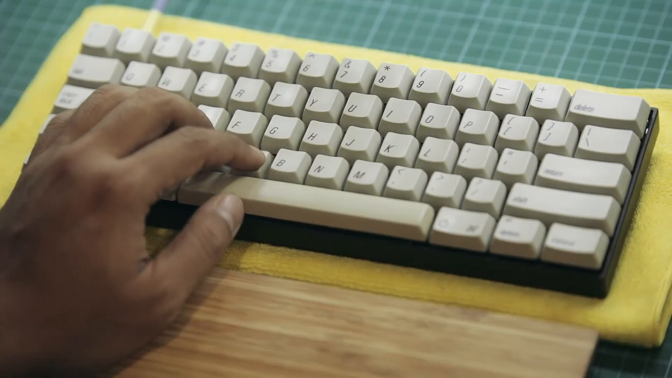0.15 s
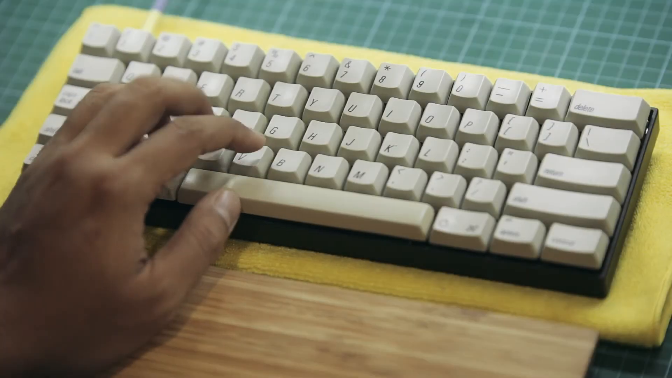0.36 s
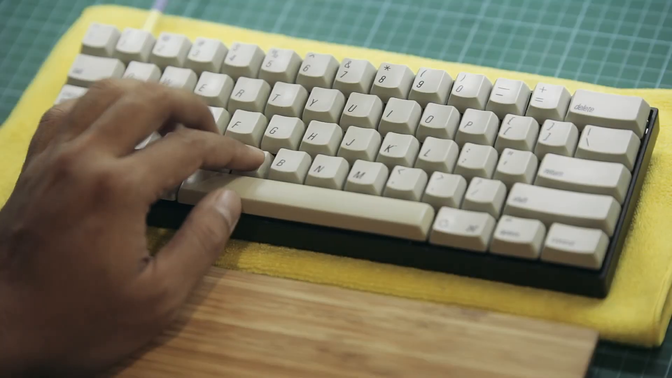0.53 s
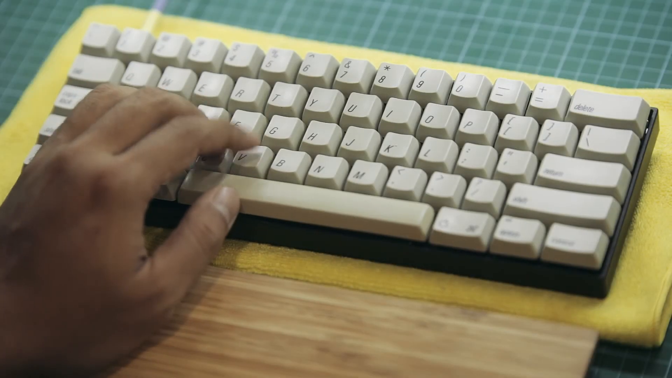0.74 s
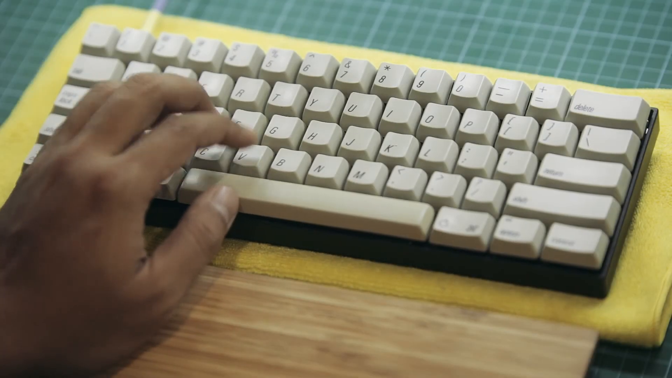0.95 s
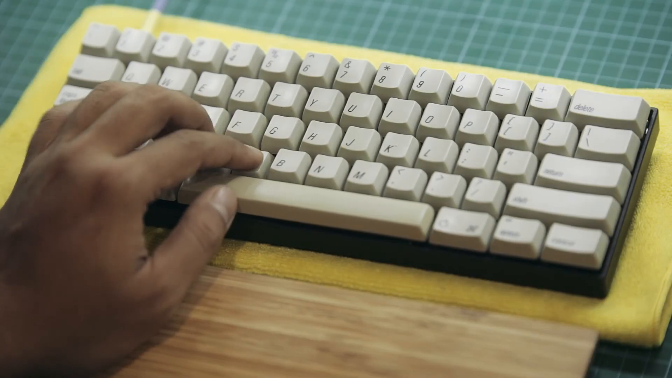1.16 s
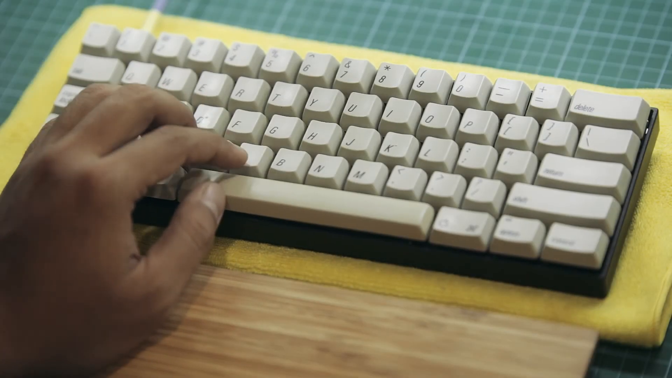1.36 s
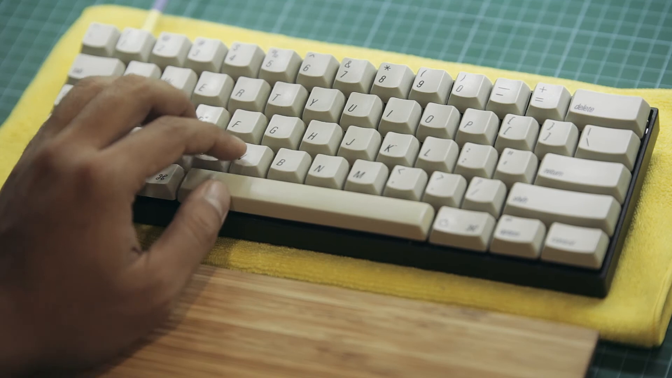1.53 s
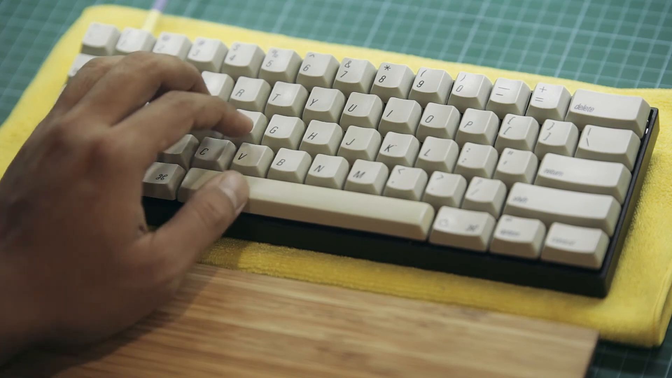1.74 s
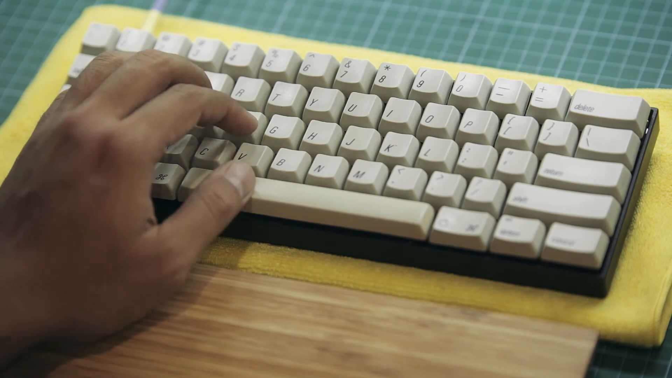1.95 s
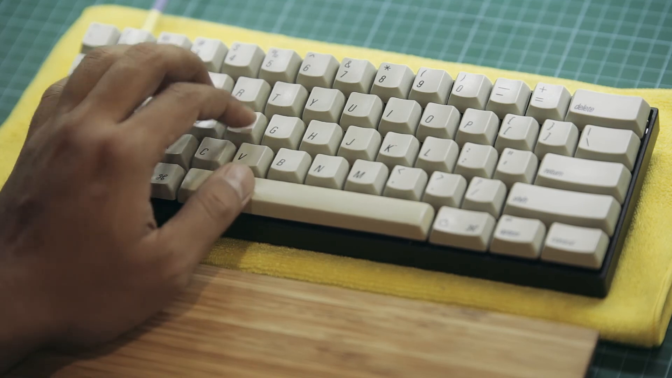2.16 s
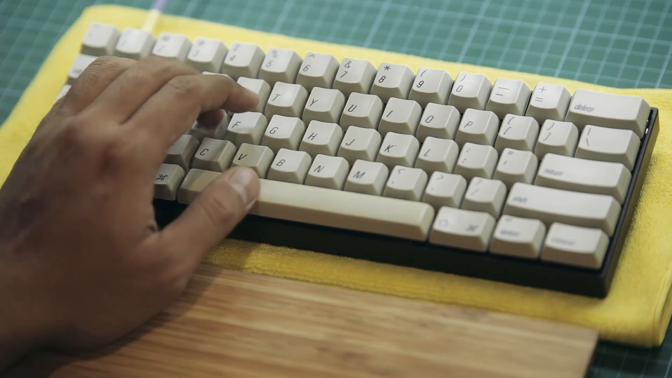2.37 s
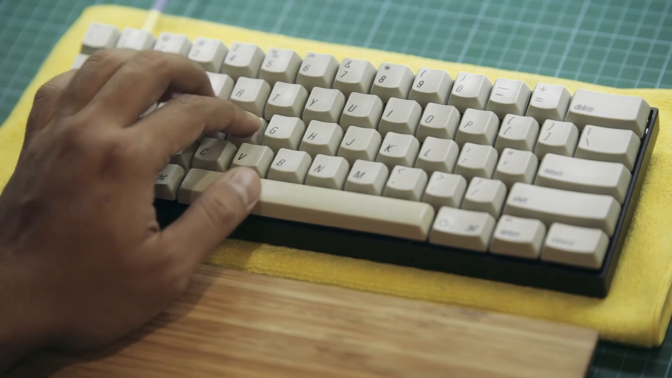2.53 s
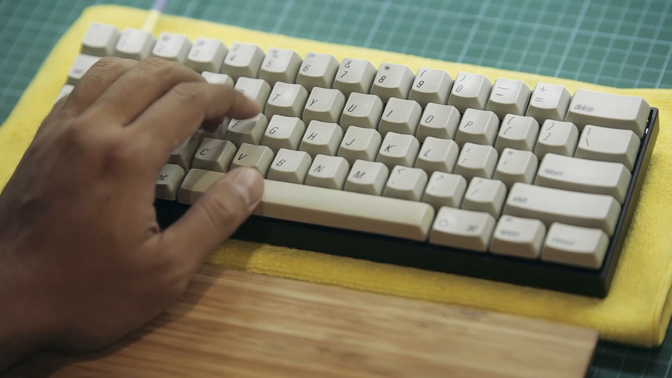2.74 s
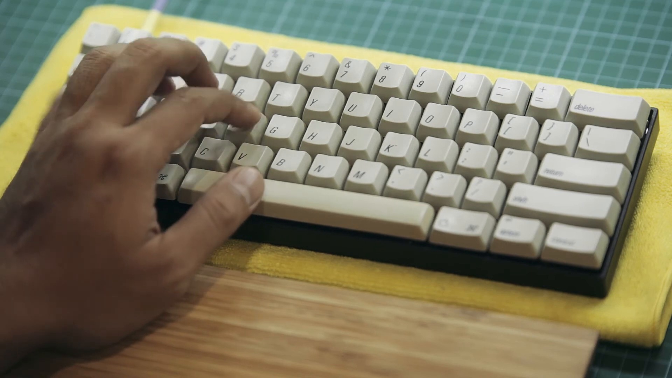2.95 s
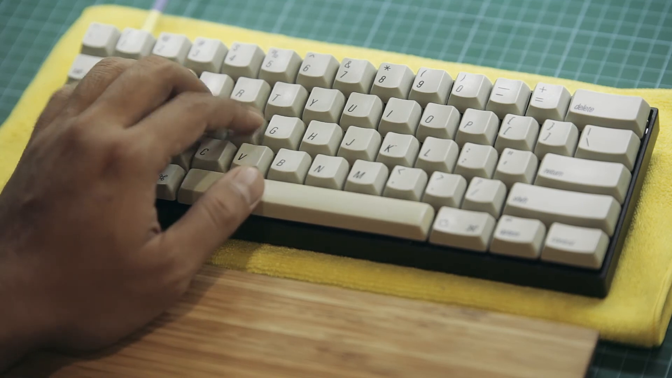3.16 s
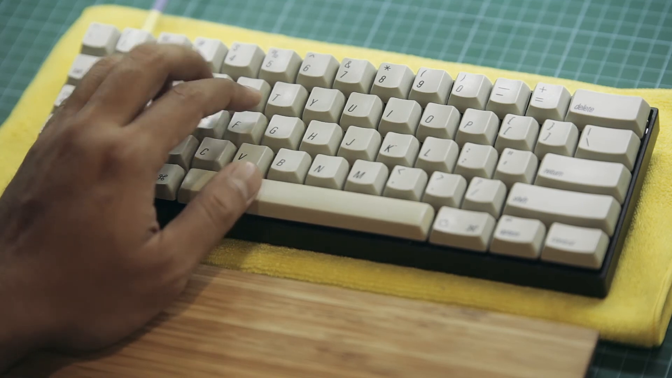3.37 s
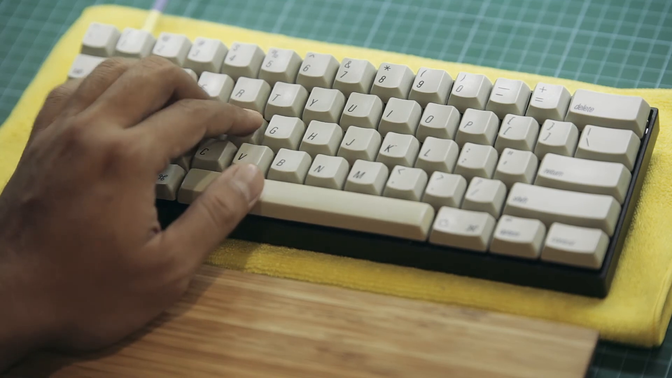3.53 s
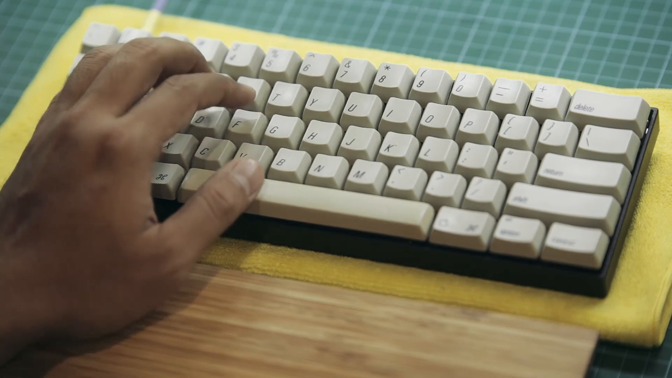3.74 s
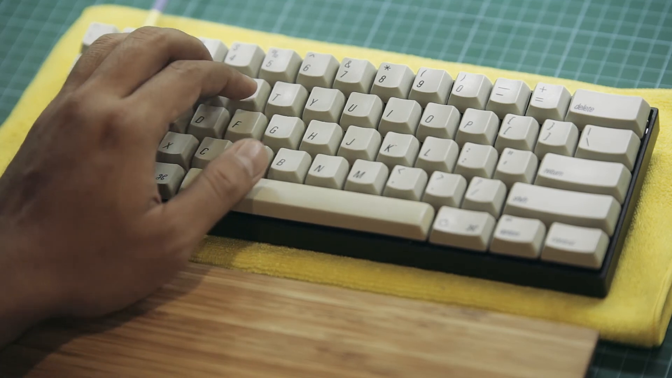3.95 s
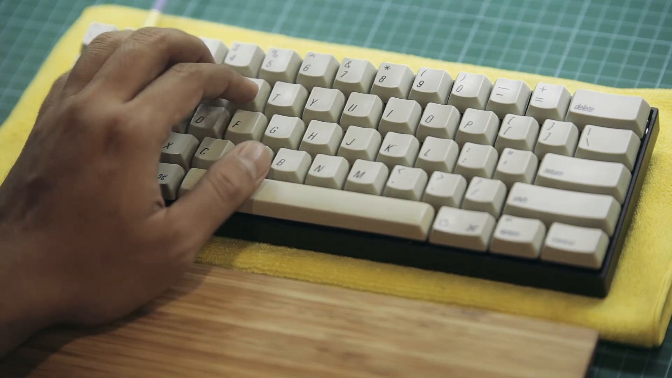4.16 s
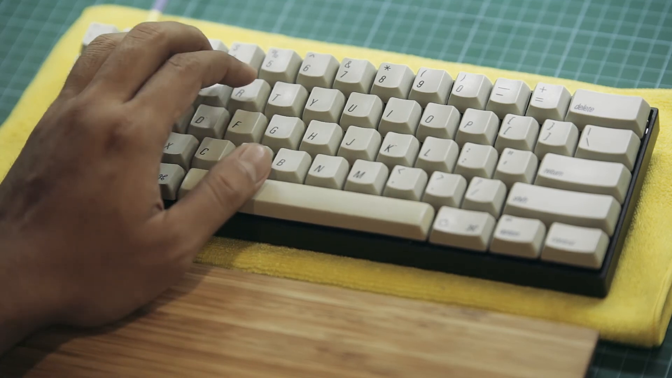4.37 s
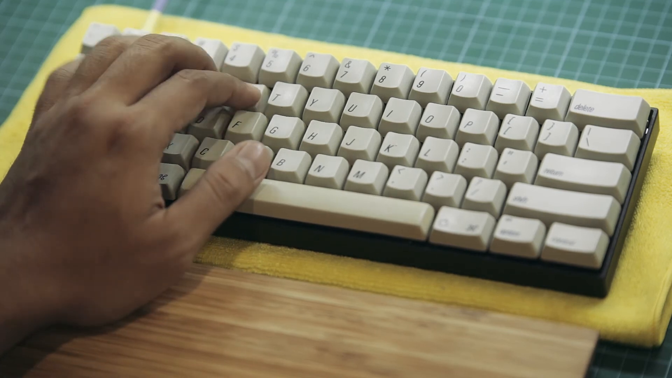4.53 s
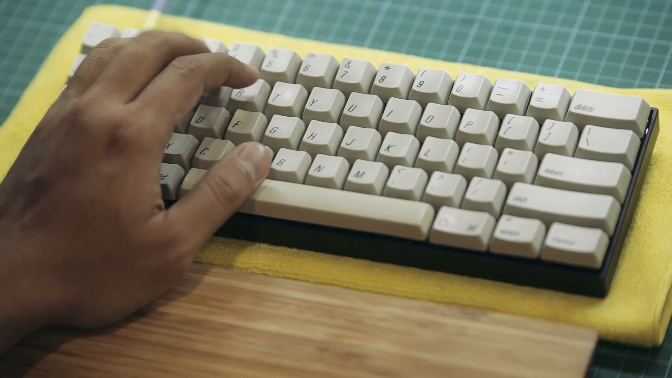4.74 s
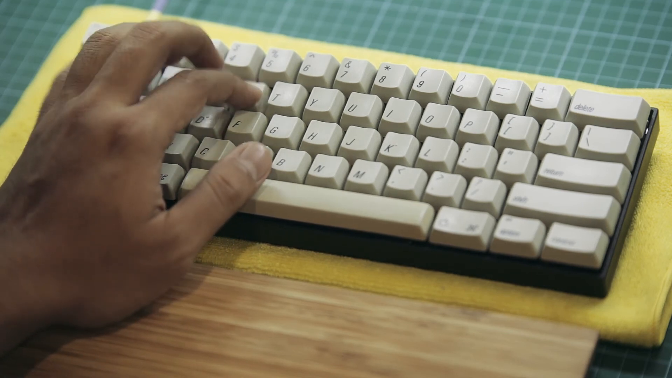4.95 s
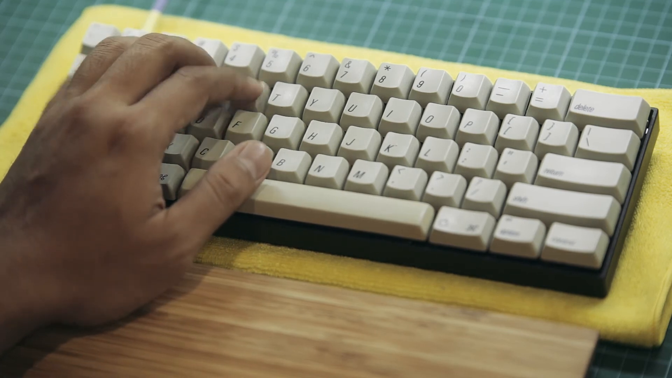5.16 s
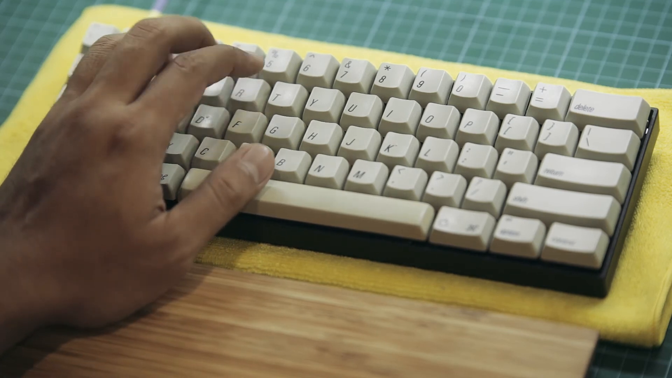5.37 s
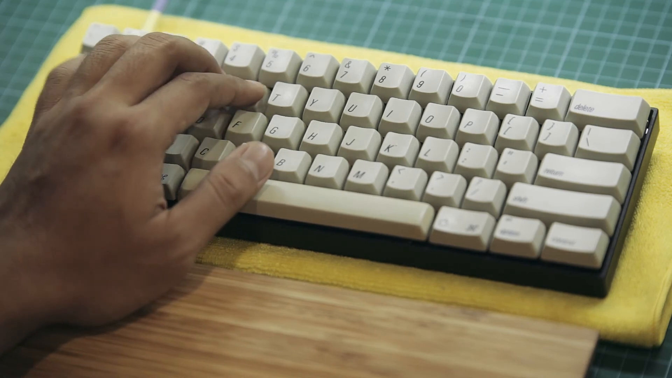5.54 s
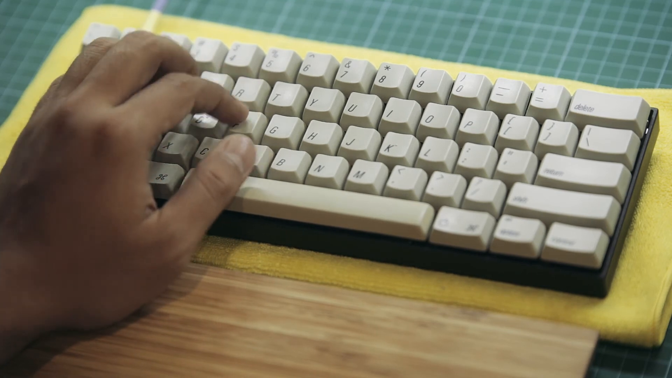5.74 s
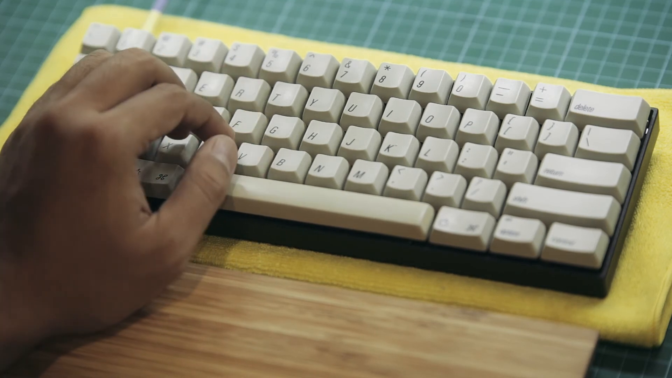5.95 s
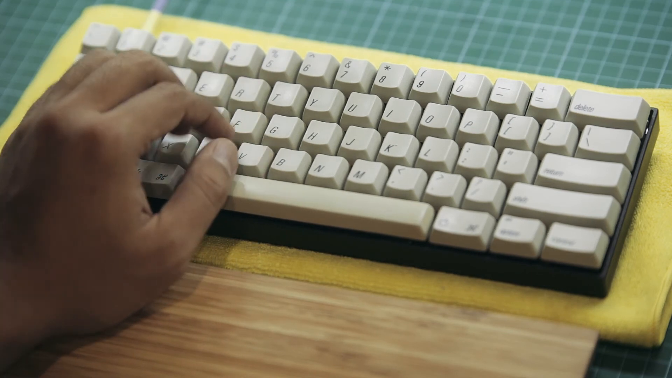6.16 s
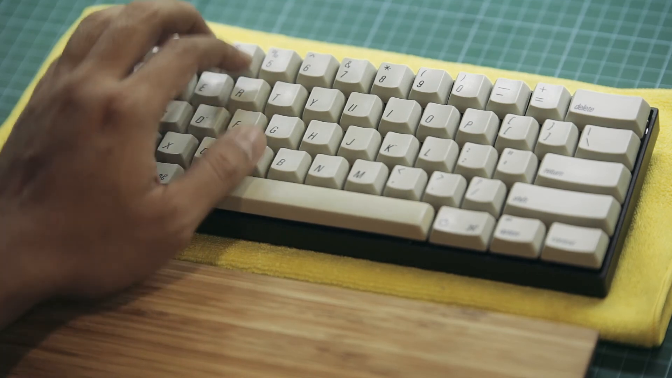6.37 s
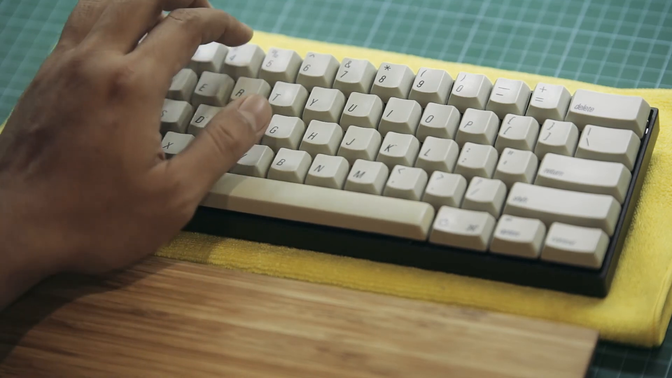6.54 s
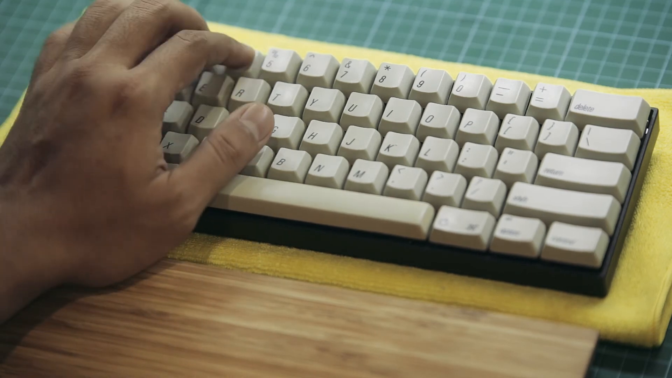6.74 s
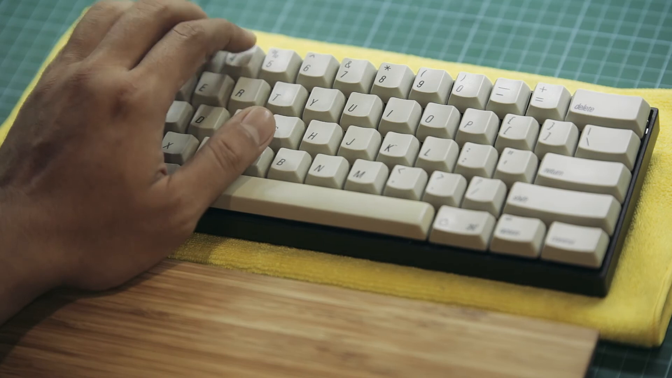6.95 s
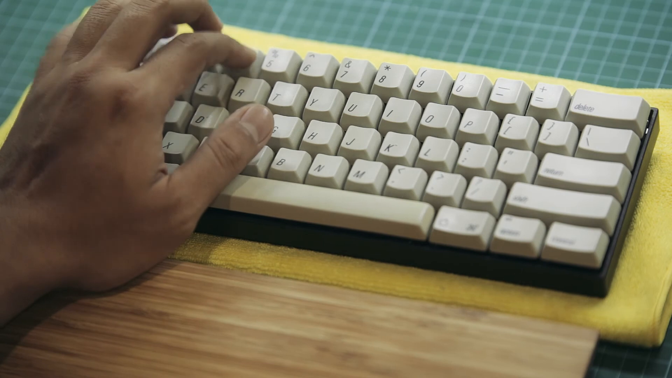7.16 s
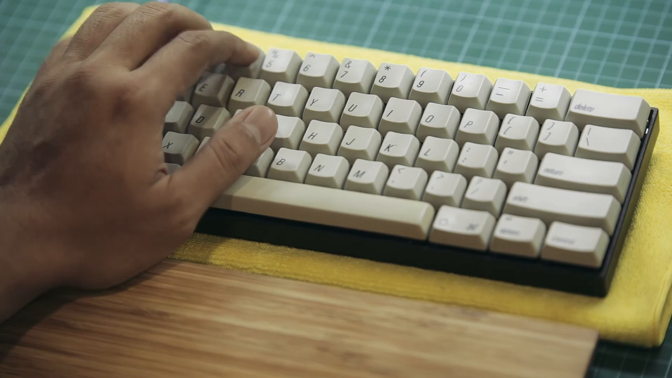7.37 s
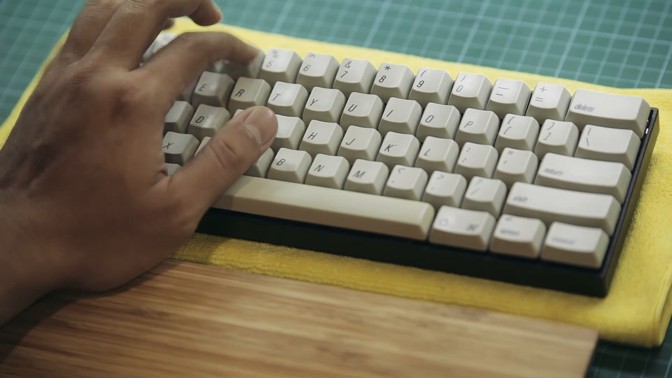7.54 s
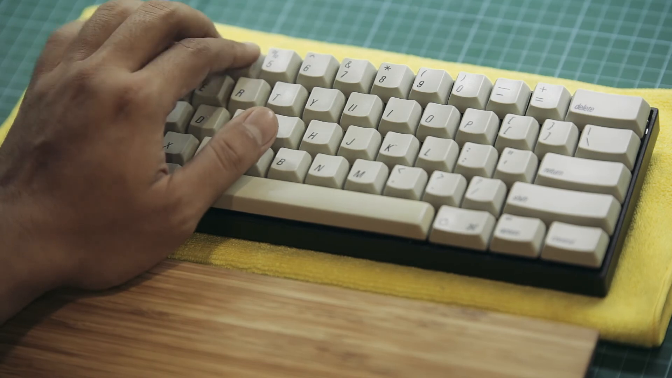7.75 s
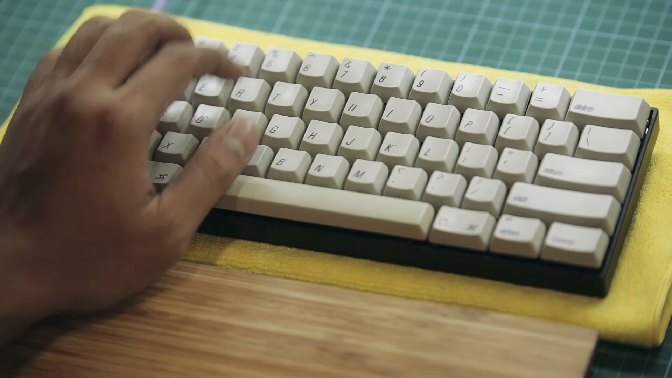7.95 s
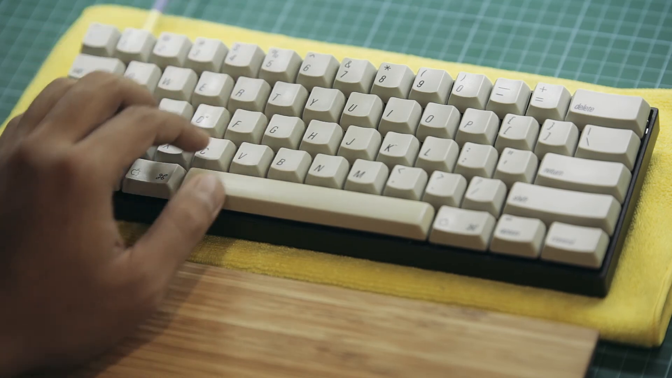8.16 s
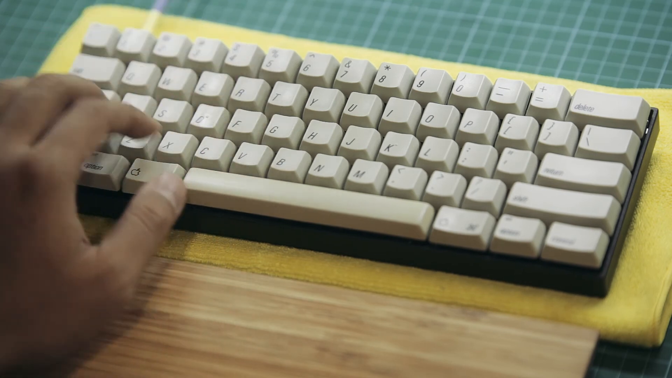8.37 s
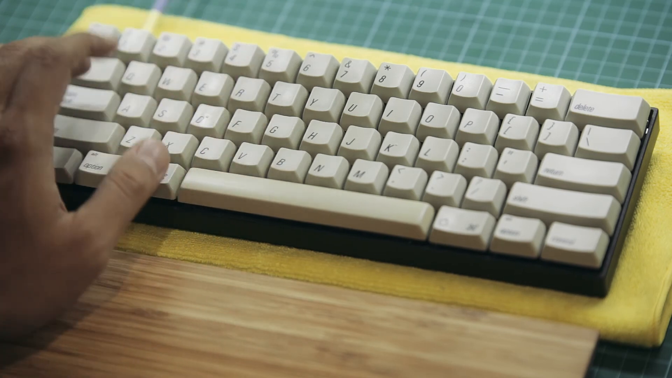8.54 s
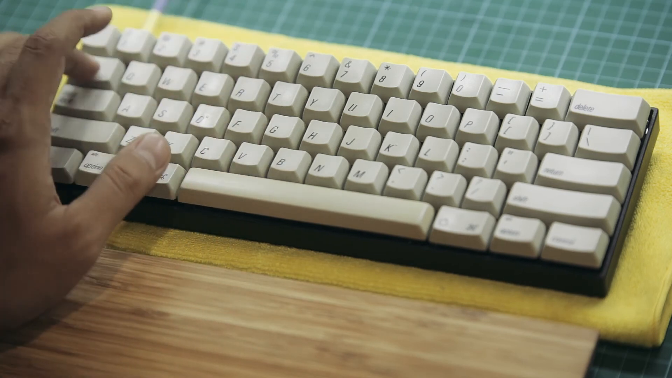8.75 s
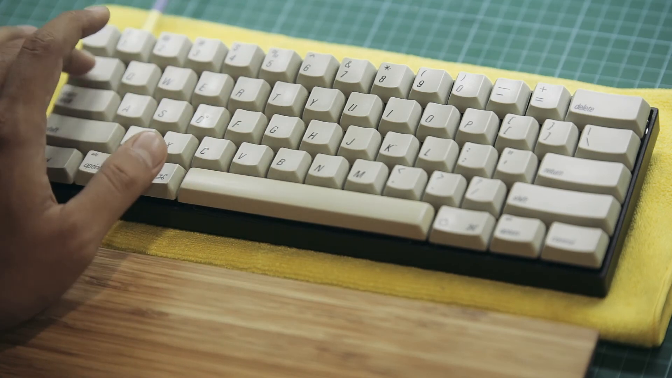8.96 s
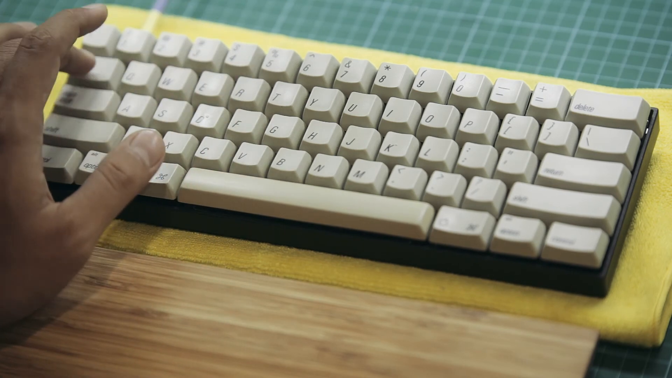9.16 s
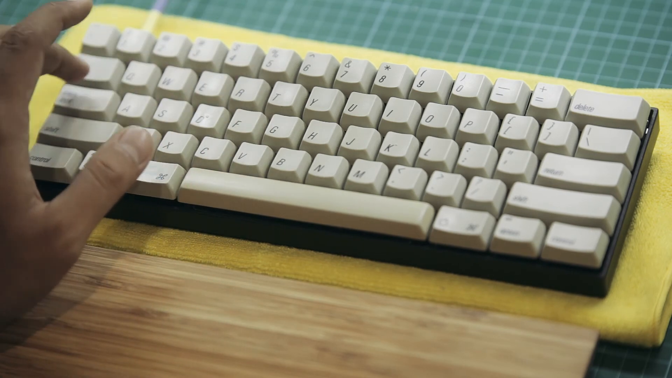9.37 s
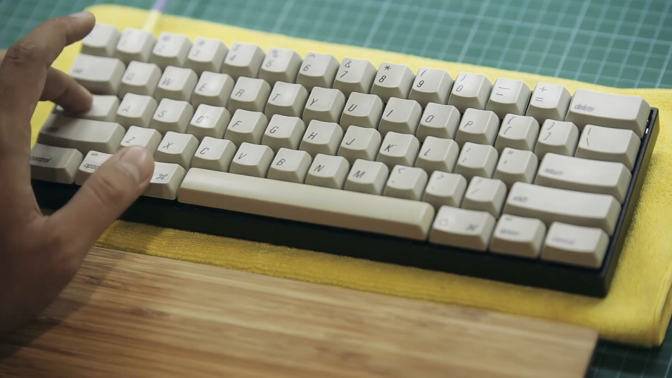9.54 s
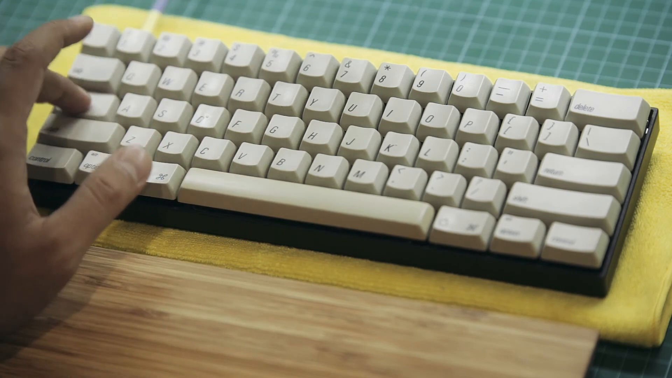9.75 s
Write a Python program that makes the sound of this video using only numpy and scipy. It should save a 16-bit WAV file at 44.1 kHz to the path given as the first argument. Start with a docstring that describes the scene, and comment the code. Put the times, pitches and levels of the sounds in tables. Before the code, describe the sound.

Close stereo pickup of a small clicky mechanical keyboard on a cloth-covered wooden desk in a small room. Dense, crisp typing comes at once, pauses, then returns in three more bursts with almost silent gaps. After a soft hiss of skin across cloth, six slower, evenly spaced presses follow, each with a click down and a lighter return. Low mains hum and faint air noise run underneath.

```python
"""A small clicky keyboard on a cloth on a wooden desk, in a small room, heard by a pair of microphones.
One hand types four fast bursts, touching keycaps between them; a fingertip makes two faint ticks before the
fourth, then the hand hisses over the cloth and one finger presses side keys slowly, six times in all.
Struck modes make keycap, case, switch and leaf; a steel plate sings on as decaying tones, the desk thuds and
noise tails are the room. Mains hum, air noise and a faint whine lie underneath throughout."""
import sys
import numpy as np
from scipy import signal
from scipy.fft import rfft, irfft, next_fast_len
from scipy.io import wavfile
from scipy.ndimage import uniform_filter1d, map_coordinates

SR = 44100
rng = np.random.default_rng(int(sys.argv[2]) if len(sys.argv) > 2 else 0)


def int16_out(signal):
    """Quantize to a 16-bit WAV file."""
    q = np.round(np.clip(np.atleast_2d(signal).T, -1, 1) * 32767)
    wavfile.write(sys.argv[1], SR, q.astype(np.int16))


N = 432621

# Bright ticks, mostly the switch leaf snapping over. Each row: time in seconds, switch level in dB.
LEAF_SNAPS = [(0.0884, -30), (0.1594, -32), (0.188, -26), (0.249, -26.5), (0.4491, -30.5), (0.492, -28.5),
              (0.5177, -29.5), (0.5826, -24), (0.7465, -28.5), (0.7911, -30), (0.8625, -40.5),
              (1.0577, -28), (1.0971, -31), (1.1548, -26.5), (2.378, -38.5), (2.436, -40), (2.53, -28.5),
              (2.755, -35), (2.81, -33), (2.868, -43.5), (2.892, -29.5), (3.114, -35), (3.157, -38),
              (3.178, -30.5), (3.4013, -43), (3.592, -31.5), (4.424, -34), (4.4977, -34.5), (4.543, -31),
              (4.7333, -31.5), (4.7774, -33), (4.829, -37), (4.881, -30.5), (5.0687, -29), (5.117, -33.5),
              (5.1517, -36), (5.181, -36), (5.2068, -29), (5.3956, -25), (5.4493, -36), (5.484, -39),
              (5.5163, -30.5), (5.525, -31), (5.584, -25.5), (5.7292, -35), (6.6798, -33.5),
              (6.7483, -32.5), (6.8074, -24), (7.036, -39), (7.1286, -27), (7.331, -37), (7.355, -37.5),
              (7.412, -35), (7.49, -24.5), (7.6831, -36), (7.7072, -42), (7.7371, -40), (7.7999, -29.5)]
# Keys hitting bottom or top in the fast bursts, and one faint knock among the slow presses.
# Each row: time in seconds, keycap energy in dB, hardness (switch over keycap) in dB.
KEY_TAPS = [(0.0982, -27.5, -9.5), (0.171, -27, -13.5), (.196, -22, -12), (0.2334, -20.5, -35),
            (0.245, -34, 5), (0.261, -33, -17), (0.2853, -21.5, -14.5), (0.3159, -23.5, -4.5),
            (0.3979, -22.5, -9), (.4147, -38.5, -4.5), (0.4563, -24, -10.5), (.501, -26, -11),
            (0.5297, -26, -5.5), (0.5711, -22, -17.5), (.59, -25, -18.5), (.611, -19.5, -10),
            (0.63, -22.5, -3.5), (0.7126, -22.5, -17.5), (0.7247, -41.5, 4.5), (0.751, -20, -19),
            (0.7816, -42, -1), (0.8114, -27, -8), (0.817, -24.5, -5), (0.8867, -22.5, -7),
            (.896, -27.5, -15.5), (0.9055, -21, -9.5), (0.9456, -24, -5), (1.0199, -19.5, -8.5),
            (1.065, -23.5, -19), (1.1055, -30, 0.5), (1.118, -24.5, -10.5), (1.173, -30.5, -17.5),
            (1.205, -22, -16.5), (1.231, -25, -11), (1.279, -29, -8), (1.3225, -25, -8.5),
            (2.385, -20, -15.5), (2.448, -25.5, -12), (2.4621, -38.5, 5.5), (2.4724, -27, -10),
            (2.5075, -20.5, -19.5), (2.5246, -40.5, 9.5), (2.543, -31, -7), (2.5818, -22.5, -9.5),
            (2.6116, -29, -3), (2.6878, -24, -8), (2.7616, -23, -13.5), (2.803, -34, -2.5),
            (2.8162, -24.5, -16), (2.8253, -29.5, -4), (2.8746, -23.5, -15.5), (2.901, -24, -7),
            (2.934, -24, -9), (2.967, -25.5, -2.5), (3.042, -25, -8), (3.0657, -39.5, -10.5),
            (3.1187, -20.5, -13), (3.1687, -25.5, -6.5), (3.1883, -28.5, -13.5), (3.2332, -35.5, -1.5),
            (3.2435, -23, -14.5), (3.261, -35, 9.5), (3.268, -25.5, -10.5), (3.3037, -24, -8.5),
            (3.3315, -26, -6), (3.4075, -22, -9), (3.497, -24.5, -7.5), (3.5033, -24, -15.5),
            (3.5135, -23.5, -4.5), (3.524, -32, -7.5), (3.5964, -20.5, -26), (3.6014, -28, -5),
            (3.6531, -26, -11), (3.6872, -27.5, -3), (3.7365, -24, -7.5), (4.3847, -38, -9),
            (4.4306, -24, -8.5), (4.508, -29.5, -13.5), (4.5537, -26.5, -3), (4.5973, -34.5, 11),
            (4.6055, -22, -14.5), (4.6462, -26.5, -9), (4.6667, -30.5, 0.5), (4.732, -28.5, -0.5),
            (4.7504, -37.5, -8), (4.7855, -28, -10), (4.8372, -29, -2.5), (4.854, -42.5, -2.5),
            (4.8925, -29, -4), (4.9313, -30.5, 8), (4.9362, -24, -4), (4.9798, -27.5, -13.5),
            (4.9948, -28.5, -0.5), (5.0745, -32, -24), (5.088, -38.5, -1), (5.125, -27.5, -13.5),
            (5.1623, -25.5, -7), (5.2174, -26.5, -8), (5.2651, -32, 6), (5.2719, -21, -3.5),
            (5.3124, -27.5, -3), (5.331, -28, -1), (5.375, -39.5, -12), (5.4042, -31.5, -10),
            (5.456, -26.5, -4), (5.492, -26.5, -6.5), (5.539, -28, -14), (5.591, -21.5, -18),
            (5.6029, -25, -9), (5.6654, -29, -6.5), (5.6834, -29, -4.5), (5.7334, -29.5, -5.5),
            (6.6865, -28.5, -23), (6.7294, -30.5, -10), (6.7562, -30.5, -8), (6.8138, -26.5, -3.5),
            (6.8495, -27.5, -21), (6.882, -31.5, 0.5), (6.9394, -28, -5), (7.0435, -28.5, -11.5),
            (7.056, -29.5, -11.5), (7.0633, -37.5, 3.5), (7.0738, -34, -0.5), (7.1373, -31.5, -6),
            (7.142, -32, 0.5), (7.1866, -27, -13.5), (7.2049, -27.5, -5.5), (7.2758, -33, -4.5),
            (7.3393, -27, -19.5), (7.366, -27, -19), (7.419, -32.5, -8.5), (7.463, -39.5, -4.5),
            (7.48, -29.5, -9), (7.5291, -24.5, -12.5), (7.5538, -30, -2), (7.6397, -28, -5),
            (7.6898, -27.5, -22), (7.7188, -32, -11), (7.7268, -39, 2.5), (7.7462, -32.5, -4),
            (7.775, -43.5, 3), (7.8047, -31, 5.5), (7.811, -28, -21), (7.8552, -27.5, -13),
            (7.8873, -30, -3.5), (7.947, -28.5, -6), (9.673, -44.5, -9)]
# One finger slowly pressing side keys. Each row: bottoming time in seconds, keycap level in dB,
# travel in seconds, hold in seconds, return over bottoming in dB.
SLOW_PRESSES = [(8.751, -26.5, 0.0095, 0.09, -7.5), (8.944, -28.5, .0238, 0.08, -6.5),
                (9.137, -28.5, .0245, .08, -8), (9.327, -29, 0.025, 0.071, -7.5),
                (9.6226, -26, 0.013, .0716, -1), (9.793, -25.5, 0.02, 0.053, -7)]
# A fingertip settling on or leaving a keycap. Each row: time in seconds, keycap level in dB, hardness in dB.
TOUCHES = [(0.0362, -54.5, -14.5), (1.555, -60.5, -12), (1.8048, -67, -0.5), (1.981, -70, -21),
           (2.144, -82, -30), (2.321, -49.5, -14), (3.944, -71.5, 6), (6.244, -64, -10), (6.4017, -72, 8),
           (6.432, -75, 5), (6.669, -49.5, -14.5), (6.785, -48, -19), (7.011, -55, -18.5),
           (7.117, -44, -13), (7.243, -45.5, -14), (7.289, -40, -14), (7.387, -41, 0)]
# Strokes that also boom in the hollow of the case. Each row: time in seconds, level in dB.
THOCKS = [(5.074, -30.5), (5.402, -27.5), (5.735, -30), (7.805, -41), ]
# The keys under the fingers. Each row: time in seconds, upper keycap modes in dB, leaf brightness in dB,
# top switch mode in dB, upper case modes in dB, keycap pitch factor, middle switch modes in dB,
# lowest switch mode in Hz, case pitch factor, case energy at a usual blow in dB.
KEY_ROWS = [(0.7, 5.5, -8.5, 1.5, 7, 0.95, -4.5, 3900, 0.98, -37),
            (2.998, 6, -5, 3.5, -2.5, 0.9, -1.5, 3800, 0.99, -31.5),
            (5.0, 2, -2.5, -5.5, 4, 0.93, -3, 4000, 1.01, -33),
            (7.3, -1, -5, 7, 5.5, 0.89, -3.5, 3250, 0.99, -29.5),
            (9.1, -2, -1, -13.5, -0.5, 0.98, -1.5, 4100, 0.992, -28.5),
            (9.7, 6.5, -13, -12, 0, 0.86, -5, 3700, 1.024, -25)]
# Modes of the parts, before pitch factors and scatter. Each row: frequency in Hz, width in Hz, level in dB.
LEAF_MODES = [(10060, 740, 5.5), (11840, 380, 0), (14000, 1700, -6)]
CAP_MODES = [(1934, 416, -5), (2336, 454, -3.5), (2690, 680, -9.5)]
CASE_MODES = [(567, 210, -2.5), (749, 129, 2), (1112, 170, -2), (1306, 230, -6)]
SWITCH_MODES = [(5300, 710, 6.5), (6270, 1600, 2), (7545, 920, 0.5)]
SPRING_MODES = [(7420, 80, -10)]
HOLLOW_MODES = [(543, 54, 0)]  # the hollow of the case
CRACK_MODES = [(6600, 12000, 0)]  # the bare crack of plastic on plastic
TRAY_MODES = [(176, 35, 2.5)]  # the case floor
# The lowest switch mode, its pitch set by the key: width in Hz, level in dB.
LOW_SWITCH = (900, 0.5)
# The desk top's sway. Each row: frequency in Hz, width in Hz, level in dB.
DESK_MODES = [(32.2, 26.8, 0.0031)]
# The steel plate. Each row: frequency in Hz, 60 dB decay time in seconds.
PLATE_MODES = [(785, 1.3), (807, .7), (851, 1.05)]
# How each entry of KEY_ROWS rings the plate. Each row: every plate mode in turn, in dB over case energy.
PLATE_BY_ROW = [(-34, -50, -41), (-35, -50, -36), (-38, -50, -36), (-45, -35, -46), (-41, -35, -46),
                (-46, -44, -48)]
# The keys at the two microphones. Each row: frequency in Hz, left over right in dB.
SIDE_BALANCE = [(200, 2), (900, -1), (5200, -3), (8200, 5), (10500, 1), (14000, -3)]
# Each row: frequency in Hz, lead of the left microphone in radians.
LEFT_LEAD = [(300, 0.13), (4500, 0.31), (6600, 1.6), (9000, 0.33), (15500, 0.17)]
# The lingering room tail. Each row: frequency in Hz, 60 dB decay time in seconds.
ROOM_DECAY = [(500, 0.72), (2500, 0.72), (6000, 0.94), (15000, 0.028)]
# Strength of the room's answer. Each row: frequency in Hz, relative level in dB.
ROOM_TONE = [(500, 4.5), (1200, 2.5), (2200, -2), (3300, -0.5), (5000, -5.5), (9000, -5), (15000, 5.5)]
# The hand shifting over the cloth. Each row: time in seconds, hiss level in dB.
CLOTH_HISS = [(7.95, -69), (8.16, -66.5), (8.239, -77), (8.5, -79), (8.7, -99)]
# Two faint fingertip ticks, then one squeak of skin on the cloth. Each row: middle in seconds,
# length in seconds, frequency in Hz, width in Hz of the resonance that is applied twice, noise level in dB.
TICKS_AND_SQUEAK = [(6.221, .012, 5000, 1300, -68), (6.238, .024, 2700, 300, -64),
                    (8.39, .2, 1950, 180, -76)]
# Mains hum, before a small tilt between the sides. Each row: frequency in Hz, rms level in dB,
# lead of the left microphone in radians, level waver in dB, phase waver in radians.
HUM_TONES = [(59.3, -63, .5, 4, 0.66), (119.8, -52.5, -1, 2, .45), (204.4, -66, 0.92, 4.5, 1.3)]
# Colour of the air noise. Each row: frequency in Hz, relative density in dB per Hz.
AIR_COLOUR = [(20, -0.5), (62, -14.5), (80, -22.5), (100, -8.5), (150, -24.5), (205, -20), (270, -29.5),
              (740, -37), (950, -42.5), (6000, -61.5), (16000, -69.5)]
# Air noise at the two microphones. Each row: frequency in Hz, left-right likeness (correlation).
AIR_LIKENESS = [(60, -0.078), (110, 0.72), (7000, 0.28)]
# A faint steady whine, each resonance applied twice. Each row: frequency in Hz, width in Hz, level in dB.
WHINE_MODES = [(6100, 280, -2), (6860, 200, -3)]
# A dip in the microphone's response: frequency in Hz, width in Hz, depth from 0 to 1.
MIC_NOTCH = (1600, 120, 0.3)

TOP_HZ = 16200  # the band limit
# a slow press: finger landing over bottoming, snap ahead of bottoming as a share of travel, snap level
LAND_DB, SNAP_SHARE, SNAP_DB = -15, .4, -7
DOWN_HARD_DB, UP_HARD_DB = -9.5, -6  # hardness of bottoming, and of landing and return
BACK_SNAP_S, BACK_SNAP_DB = 0.0049, -19  # the leaf snaps back just before the key tops out
TOUCH_CASE_DB, TOUCH_DULL = -13, 0.96  # softer touches move the case more
USUAL_DB, CASE_FOLLOWS, CASE_SCATTER_DB = -29.5, 0.89, 2.5  # the case swings less than the keycap
LEAF_DB = -13  # leaf under switch when a key knocks
SNAP_CAP_DB, SNAP_CASE_DB, SNAP_LEAF_DB = -5.5, -17, -4  # under the switch when the leaf snaps
SNAP_BUZZ = 1.5  # a snap rattles this many times longer than a knock, and looser in the switch
CRACK_DB = -11  # under the switch
ROOM_DB, ROOM_CRACK_DB = -17.5, 0  # the crack spreads evenly, so the walls get more of it
# the stem rubs its guide: level, 60 dB rise before and 60 dB fall after a blow
SCRAPE_DB, RUN_UP_S, DRAG_S = -7.5, 0.0034, 0.055
DRAG_DROP = 0.11  # the drag starts this share of 60 dB lower
RETURN_BOOM_DB = -0.5  # a side key booms as it tops out, over its keycap level
SMALL_HZ = 330  # the small case radiates little below this
RATTLES = 3  # ticks of a loose keycap after each blow
AIR_DB, WHINE_DB = -49.5, -89.0


def amp(db):
    """Gain of a level in dB."""
    return 10 ** (np.asarray(db) / 20)


def unit(x):
    """Scale to rms 1."""
    return x / np.sqrt(np.mean(x ** 2) + 1e-20)


def along(points, hz):
    """Read (Hz, value) points on a log frequency axis."""
    f, v = np.transpose(points)
    return np.interp(np.log(hz + 1), np.log(f + 1), v)


def resonances(modes, hz, gains=None):
    """Causal response of a set of damped modes with alternating sign; gains reweight each of them."""
    gains = np.ones(len(modes)) if gains is None else gains
    return sum((-1) ** k * gains[k] * amp(db) * 1j * hz * w / (c * c - hz * hz + 1j * hz * w)
               for k, (c, w, db) in enumerate(modes))


def filtered(x, response):
    """Shape x by a complex response of frequency."""
    m = next_fast_len(N + SR)
    return irfft(rfft(x, m) * response(np.fft.rfftfreq(m, 1 / SR)), m)[..., :N]


def waver(rate_hz):
    """Smooth random curve through about rate_hz random points a second."""
    t = np.arange(N) / SR
    return map_coordinates(rng.standard_normal(N // 1000), [t * rate_hz])


def keys():
    """Keycap, case, switch and leaf ring together at each contact; plate and spring ring along."""
    s, cap_db, case_db, switch_db, leaf_db, snaps = contacts()
    buzz = SNAP_BUZZ ** snaps[:, None]
    (when, upper_db, bright_db, top_db, thin_db, pitch,
     middle_db, low_hz, case_pitch) = np.transpose(KEY_ROWS)[:-1]
    by_row = lambda column: np.interp(s, when, column)[:, None]
    case_db = case_db + CASE_SCATTER_DB * rng.standard_normal(len(s))
    upper, top, thin, middle = amp([by_row(db) for db in (upper_db, top_db, thin_db, middle_db)])
    even = np.ones_like(top)
    cap = struck(CAP_MODES, s, cap_db, 0.016, loose=0.093, detune=0.0093, scatter_db=0.0, aside=0.06,
                 weights=np.array([even, upper, upper]), pitch=by_row(pitch))
    # keys with weak upper keycap modes ring the lowest case mode more
    case_weights = np.array([1 / np.sqrt(upper), even, thin, thin])
    case = struck(CASE_MODES, s, case_db, 0.05, loose=0.045, detune=0.0082, scatter_db=2, aside=0.042,
                  weights=case_weights, pitch=by_row(case_pitch))
    switch_modes = [(by_row(low_hz), *LOW_SWITCH)] + list(SWITCH_MODES)
    switch = struck(switch_modes, s, switch_db, 0.012 * buzz, loose=0.22 * buzz, detune=0.03,
                    scatter_db=2.5, aside=0.3, weights=np.array([even, middle, middle, top]))
    leaf_db = leaf_db + np.interp(s, when, bright_db) + 3 * rng.standard_normal(len(s))
    leaf = struck(LEAF_MODES, s, leaf_db, 0.0042 * buzz, loose=0.32, detune=0.034, scatter_db=3.0, aside=0.25)
    crack = struck(CRACK_MODES, s, switch_db + CRACK_DB, 0.0045, loose=0.12, detune=0.12,
                   scatter_db=1.5, aside=0.22)
    thock = struck(HOLLOW_MODES, *booms(), 0.048, loose=0.067, detune=0.021, scatter_db=0, aside=.04)
    board = cap + case + switch + leaf + crack + thock + wobbles(s, cap_db)
    board = filtered(board, lambda hz: (1j * hz / (SMALL_HZ + 1j * hz)) ** 2)
    spring = filtered(board, lambda hz: resonances(SPRING_MODES, hz))
    return board + plate(s, case_db, when) + spring, crack


def contacts():
    """All contacts as columns (s, keycap, case, switch, leaf dB, 1 for a snap); snaps hardly move the case."""
    down_s, db, travel, held, up_db = np.transpose(SLOW_PRESSES)
    landing = (down_s - travel, db + LAND_DB, UP_HARD_DB)
    bottoming = (down_s, db, DOWN_HARD_DB)
    topping = (down_s + held, db + up_db, UP_HARD_DB)
    slow = [np.broadcast_arrays(*step) for step in (landing, bottoming, topping)]
    s, cap, hard = np.hstack([np.transpose(KEY_TAPS)] + slow)
    row = np.transpose(KEY_ROWS)
    case = np.interp(s, row[0], row[-1]) + CASE_FOLLOWS * (cap - USUAL_DB)
    touch_s, touch, soft = np.transpose(TOUCHES)
    touch_case = touch + TOUCH_CASE_DB - TOUCH_DULL * soft
    s, cap, case, hard = np.hstack([[s, cap, case, hard], [touch_s, touch, touch_case, soft]])
    snap_s, snap = np.hstack([np.transpose(LEAF_SNAPS),
                              [down_s - SNAP_SHARE * travel, db + SNAP_DB],
                              [down_s + held - BACK_SNAP_S, db + BACK_SNAP_DB]])
    knocks = [s, cap, case, cap + hard, cap + hard + LEAF_DB, np.zeros_like(s)]
    snaps = [snap_s, snap + SNAP_CAP_DB, snap + SNAP_CASE_DB, snap, snap + SNAP_LEAF_DB, np.ones_like(snap)]
    both = np.hstack([knocks, snaps])
    return both[:, both[0] < N / SR]


def struck(modes, s, db, contact_s, loose, detune, scatter_db, aside, weights=1, pitch=1):
    """A scraping run-up, a sharp blow and a dying, rebounding rattle drive the modes; db is energy over 5 ms."""
    size, early, count = 2560, 320, len(s)  # samples in all, samples ahead of the blow
    t = (np.arange(size) - early) / SR
    rebound = rng.random((count, 2))  # lateness and strength
    after = t - (0.001 + .0035 * rebound[:, :1])
    rubbing = np.where(t < 0, -t / RUN_UP_S, t / DRAG_S + DRAG_DROP)
    scrape = amp(SCRAPE_DB + 4 * rng.standard_normal((count, 1)) - 60 * rubbing)
    first_rattle = (t >= 0) * amp(-60 * abs(t) / contact_s)
    second_rattle = 0.56 * rebound[:, 1:] ** 2 * (after > 0) * amp(-60 * abs(after) / contact_s)
    dying = scrape + first_rattle + second_rattle
    knock = (t == 0) + 0.35 * rebound[:, 1:] * (abs(after) < .5 / SR)
    force = rfft(knock + loose * rng.standard_normal((count, size)) * dying)
    chance = rng.standard_normal((count, 3 * len(modes) + 1)).T[:, :, None]
    strength, balance, lead = np.split(chance[:-1], 3)
    hz = np.fft.rfftfreq(size, 1 / SR) * (1 + detune * chance[-1]) / pitch
    gains = weights * amp(scatter_db * strength)
    turn = np.exp(aside * (balance + 1j * lead) / 2)  # each mode beams unevenly at the two microphones
    ring = irfft([force * resonances(modes, hz, g) for g in (gains * turn, gains / turn)], size)
    ring *= np.hanning(2 * size)[size:]  # the ring fades out fully
    energy = np.sum(ring.mean(0) ** 2, axis=1)
    ring *= (amp(db) * np.sqrt(SR / 200 / energy))[:, None]
    at = np.round(s * SR).astype(int)[:, None] + np.arange(size)
    return np.array([np.bincount(at.ravel(), side.ravel(), N + size)[early:N + early] for side in ring])


def booms():
    """Times and levels of the strokes that reach the hollow of the case."""
    down_s, db, _, held, up_db = np.transpose(SLOW_PRESSES)
    both = np.hstack([np.transpose(THOCKS), [down_s + held, db + up_db + RETURN_BOOM_DB]])
    return both[:, both[0] < N / SR]


def wobbles(s, cap_db):
    """Loose keycaps tick faintly against their stems some while after each contact."""
    chance = rng.random((len(s), RATTLES, 2))
    delay_s = 0.0098 + 0.082 * chance[..., 0] ** 1.4
    late_s = np.minimum(s[:, None] + delay_s, N / SR).ravel()
    tick_db = (cap_db[:, None] - 33 - 16 * chance[..., 1]).ravel()
    modes = list(CAP_MODES) + list(SWITCH_MODES) + list(CRACK_MODES)
    return struck(modes, late_s, tick_db, 0.009, loose=0.48, detune=0.048, scatter_db=10.5, aside=0.33)


def plate(s, case_db, when):
    """Every contact adds energy to each steel mode, which drains at its own rate; the tone flutters a little."""
    t, at = np.arange(N) / SR, np.round(s * SR).astype(int)
    song = 0
    for (hz, t60), by_row_db in zip(PLATE_MODES, np.transpose(PLATE_BY_ROW)):
        blows = np.bincount(at, amp(case_db + np.interp(s, when, by_row_db)) ** 2, N)[:N]
        energy = signal.lfilter([1], [1, -amp(-120 / t60 / SR)], blows)
        size = uniform_filter1d(np.sqrt(2 * energy), size=SR // 200) * amp(2.5 * waver(9))
        song = song + size * np.sin(2 * np.pi * hz * t + .5 * waver(9))
    return song


def desk():
    """Contacts push softly through the cloth: the desk sways unlike under each microphone, the case floor thuds."""
    s, cap_db, case_db = contacts()[:3]
    at = np.round(s * SR).astype(int)
    pushes, thuds = np.zeros((2, N)), np.zeros(N)
    pushes[:, at] = amp(0.38 * cap_db + 29.0) * np.cos(rng.uniform(0, 2.52, (len(s), 2))).T
    thuds[at] = amp(0.42 * case_db + 17.5) * rng.uniform(0.058, 1, len(s))
    soft = lambda modes: lambda hz: resonances(modes, hz) / (1 + 1j * hz / 300)
    sway = filtered(pushes, soft(DESK_MODES)) * amp([[1.5], [-1.5]])  # left, right in dB
    return sway + filtered(thuds, soft(TRAY_MODES)) * amp([[1], [-1]])


def hand():
    """Highpassed noise is skin hissing over the cloth; narrow noise bands make two fingertip ticks and a squeak."""
    t = np.arange(N) / SR
    s, hiss_db = np.transpose(CLOTH_HISS)
    hiss = filtered(rng.standard_normal((2, N)), lambda hz: hz / (hz + 3000))
    ticks_and_squeak = 0
    for mid, length, c, w, db in TICKS_AND_SQUEAK:
        band = filtered(rng.standard_normal(N), lambda hz: resonances([(c, w, 0)], hz) ** 2)
        swell = np.exp(-(2 * (t - mid) / length) ** 2)
        ticks_and_squeak = ticks_and_squeak + amp(db) * swell * unit(band)
    return amp(np.interp(t, s, hiss_db, left=-140, right=-140)) * unit(hiss) + ticks_and_squeak


def room(x):
    """Desk and near walls answer first and briefly, the whole room lingers; each frequency dies at its own speed."""
    hz, t, z = signal.stft(rng.standard_normal((2, SR * 2 // 3)), SR, nperseg=256)
    fall_db = -60 * t / along(ROOM_DECAY, hz)[:, None]
    envelope = amp(fall_db) + 4.6 * amp(3.9 * fall_db)  # lingering, then brief
    tone = amp(along(ROOM_TONE, hz))[:, None]
    tail = signal.istft(z * envelope * tone, SR, nperseg=256)[1]
    delayed = np.pad(x, ((0, 0), (200, 0)))  # samples
    return signal.fftconvolve(delayed, tail / np.linalg.norm(tail[0]), axes=1)[:, :N]


def background():
    """Wavering mains hum and a whine of narrow noise, over air noise most alike at both microphones near 110 Hz."""
    t = np.arange(N) / SR
    hum = 0
    for hz, db, lead, waver_db, drift in HUM_TONES:
        level = np.sqrt(2) * amp(db + waver_db * waver(11))
        hum = hum + level * np.sin(2 * np.pi * hz * t + drift * waver(11) + [[lead], [0]])
    turn = lambda hz: np.arccos(np.clip(along(AIR_LIKENESS, hz), -1, 1)) / 2
    shape = lambda hz: amp(along(AIR_COLOUR, hz)) * [np.cos(turn(hz)), np.sin(turn(hz))]
    mid, side = filtered(rng.standard_normal((2, N)), shape)
    air = unit(np.array([mid + side, mid - side]))
    whine = filtered(rng.standard_normal((2, N)), lambda hz: resonances(WHINE_MODES, hz) ** 2)
    return hum * amp([[.7], [-.7]]) + amp(AIR_DB) * air + amp(WHINE_DB) * unit(whine)


def scene():
    """The keyboard reaches the two microphones with its own balance and lead at each frequency."""
    board, crack = keys()
    half = lambda hz: amp(along(SIDE_BALANCE, hz) / 2) * np.exp(.5j * along(LEFT_LEAD, hz))
    direct = filtered(board, lambda hz: np.array([half(hz), 1 / half(hz)]))
    answer = amp(ROOM_DB) * room(board + amp(ROOM_CRACK_DB) * crack)
    return direct + desk() + hand() + answer + background()


def record(dry):
    """The microphone has one narrow dip; a steep band limit removes the very top."""
    centre_hz, width_hz, depth = MIC_NOTCH
    heard = filtered(dry, lambda hz: 1 - depth * resonances([(centre_hz, width_hz, 0)], hz))
    return filtered(heard, lambda hz: 1 / (1 + (hz / TOP_HZ) ** 150))


dry = scene()
out = record(dry)
int16_out(out)
```